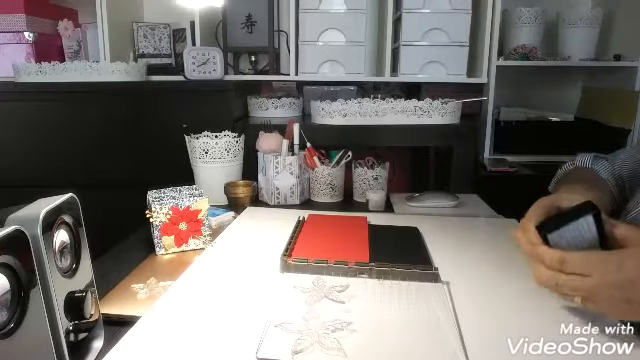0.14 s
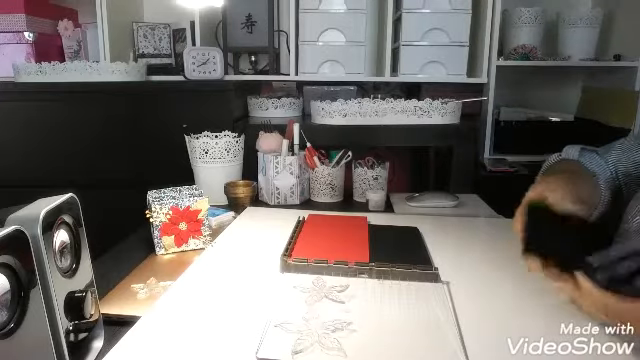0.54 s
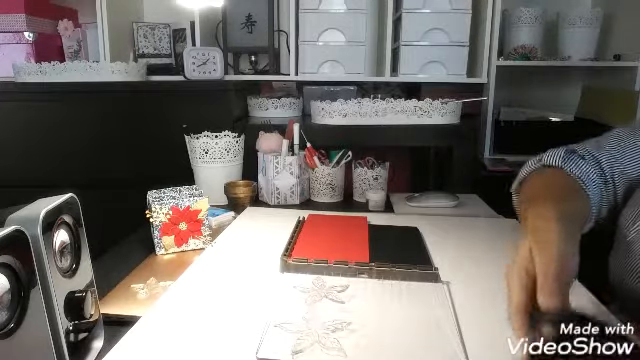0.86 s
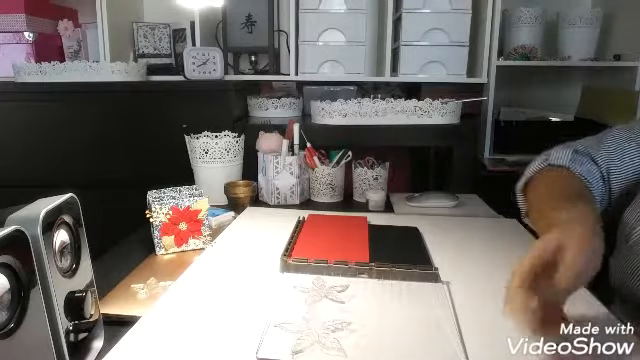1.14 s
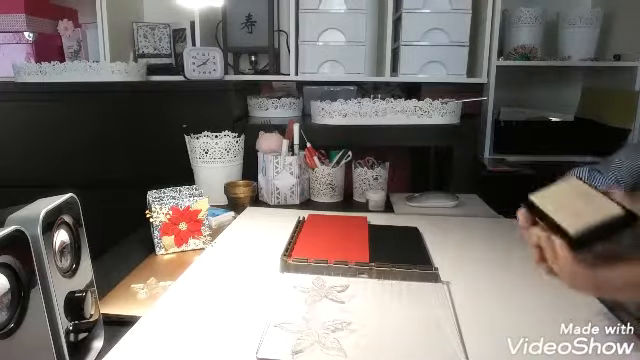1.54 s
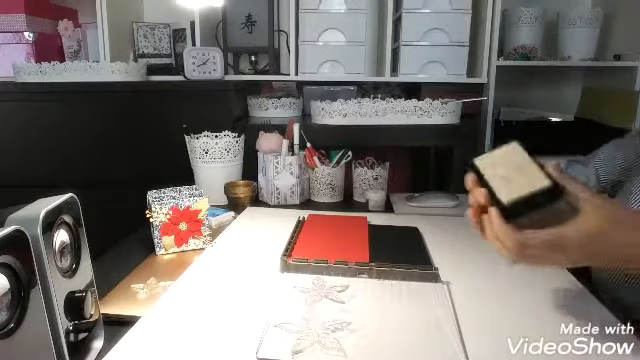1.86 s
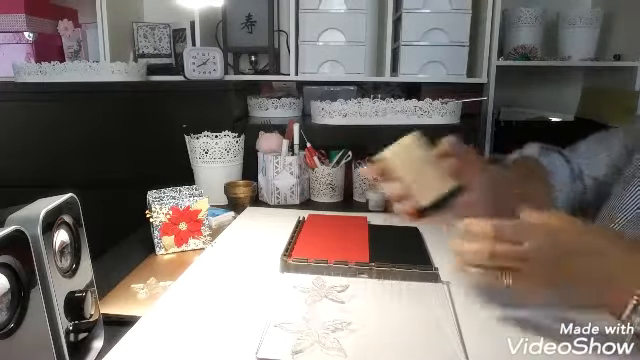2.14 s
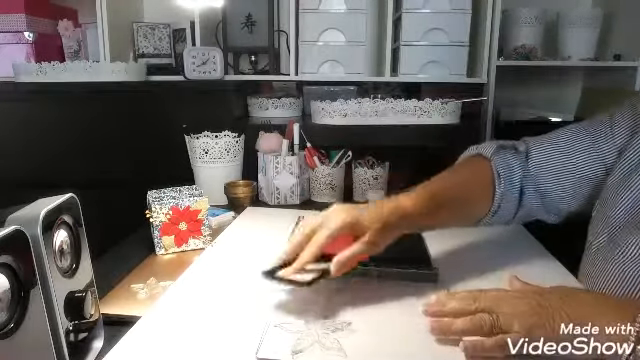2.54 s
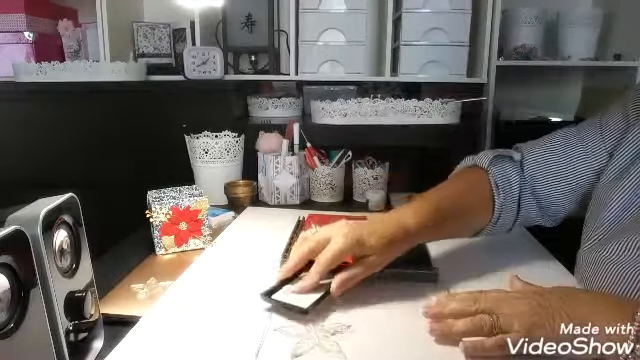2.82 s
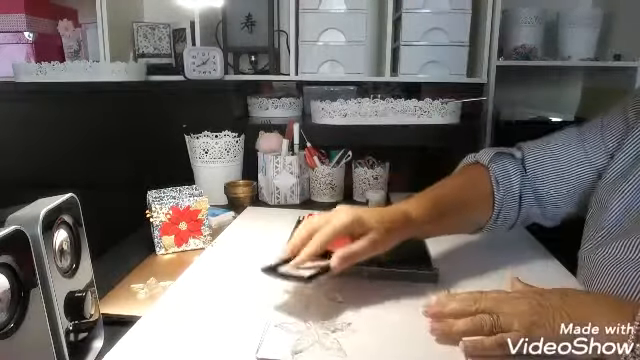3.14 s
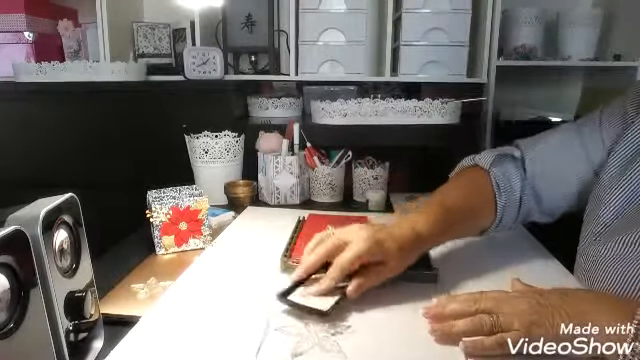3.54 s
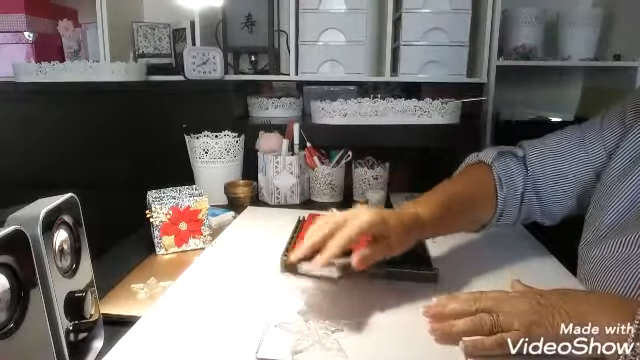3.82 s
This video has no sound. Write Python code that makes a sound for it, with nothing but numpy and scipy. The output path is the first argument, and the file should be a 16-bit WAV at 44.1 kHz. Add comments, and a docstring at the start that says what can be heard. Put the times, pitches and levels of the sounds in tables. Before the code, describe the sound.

A plastic ink pad lid clatters onto a craft table, then the pad is dabbed on a rubber stamp with light, hollow taps.

```python
"""Sleeves rustle over faint hiss, with a tick or two, then a plastic ink pad's lid clatters onto a craft table.
The lid rings as damped modes. The pad is then dabbed on a rubber stamp: a short rub leads most presses,
each press chatters, rings the case and thuds the table, and the tacky ink peels with a soft crackle.
A small furnished room answers with decaying noise; the pair of microphones hears it almost in mono."""
import sys
import numpy as np
from scipy import signal
from scipy.fft import rfft, irfft
from scipy.io import wavfile

SR = 44100
rng = np.random.default_rng(int(sys.argv[2]) if len(sys.argv) > 2 else 0)


def unload_wav(signal):
    """Save mono or channel-first audio to the path in sys.argv[1] as 16-bit WAV at rate SR, clipped to [-1, 1]."""
    wavfile.write(
        sys.argv[1],
        SR,
        np.round(np.clip(np.atleast_2d(signal).T, -1, 1) * 32767).astype(np.int16),
    )


N = 258988
HIT_N = 16000  # length of one contact with its tail, in samples
HIT_T = np.arange(HIT_N) / SR

# The pad knocks on the stamp: firm landings, and light knocks, one of them as the pad lifts away. Each row: #
# time in seconds, level in dB, treble and table thump in dB relative to that level, lead of the slide's start #
# over the knock in seconds (0 for none).
DAB_KNOCKS = [(3.1936, -33, -12.5, -22, .109), (3.6814, -48.5, -7.5, -16, 0),
              (3.7804, -34.5, -10.5, -10, .115), (4.4158, -35, -11, -5, .099), (4.758, -53, -19, 4, 0),
              (5.0298, -44.5, -19.5, -10, .075), (5.5084, -33, -13, -12.5, .084)]
# Ringing of the pad's case on the table. Each row: frequency in Hz, strength in dB, t60 in seconds.
CASE_MODES = [(263, -1, 0.19), (313, 4.5, 0.093), (488, -7, 0.083), (606, -4, 0.15), (801, 4.5, 0.21),
              (945, -24, 0.22), (1216, -16, 0.12), (1330, 14.5, 0.043), (1483, 15, 0.062), (1550, -36, 1),
              (1823, -6, 0.6), (1884, -5, 0.13), (1903, 10, 0.083), (1836, -15, 0.056), (2070, 10, 0.08),
              (2158, 3.5, 0.14), (2304, -2.5, 0.13), (2690, -16, 0.39), (3414, 0, 0.054),
              (4060, -2.5, 0.055)]
GRAZE_LEAD_S = 0.04  # the pad's edge grazes the stamp this long before it lands


def undb(db):
    """Decibels to gain."""
    return 10 ** (np.asarray(db) / 20)


def unit(x):
    """Scale to unit energy."""
    return x / np.sqrt(np.sum(x ** 2))


def add(track, s, sound):
    """Mix a sound into the track at a time in seconds."""
    start = max(int(s * SR), 0)
    track[start:start + len(sound)] += sound[:N - start]


def band(x, hz, kind, order=2):
    """Butterworth filter."""
    edges = np.clip(hz, 10, SR / 2 - 500)
    return signal.sosfilt(signal.butter(order, edges, kind, fs=SR, output="sos"), x)


def tint(x, points, size=2048):
    """Causal filter through (Hz, dB) points, built from the cepstrum."""
    hz, db = np.transpose(points)
    grid = np.maximum(np.arange(size // 2 + 1) * SR / size, 1)
    cepstrum = irfft(np.log(undb(np.interp(np.log(grid), np.log(hz), db))))
    # folding the cepstrum forward gives minimum phase
    cepstrum[1:size // 2] *= 2
    cepstrum[size // 2 + 1:] = 0
    response = irfft(np.exp(rfft(cepstrum)))
    return signal.fftconvolve(x, response)[:len(x)]


def fade(t60):
    """Exponential decay over the length of a hit."""
    return np.exp(-np.log(1000) * HIT_T / max(t60, 1 / SR))


def wander(points):
    """Random values joined by straight lines over the whole scene."""
    return np.interp(np.arange(N), np.linspace(0, N, points), rng.standard_normal(points))


def echoes(early_t60, room_t60, room_db):
    """Dense early reflections that die quickly, then the tail of the room."""
    near, far, size = rng.standard_normal((3, HIT_N))
    early = unit(near * undb(2.2 * size) * fade(early_t60))
    tail = unit(far * fade(room_t60) * (1 - fade(0.041)))
    return unit(early + undb(room_db) * tail)


def ring(modes, detune, damping):
    """Damped modes; strength and tuning vary with where the blow lands; contact adds damping (1/s)."""
    hz, db, t60 = np.transpose(modes)[:, :, None]
    size, shift, phase = rng.standard_normal((3, len(modes), 1))
    waves = np.sin(2 * np.pi * (hz * (1 + detune * shift) * HIT_T + phase))
    decays = np.exp(-(np.log(1000) / t60 + abs(damping)) * HIT_T)
    ringing = np.sum(undb(db + 2.0 * size) * decays * waves, axis=0)
    return unit(ringing * (1 - fade(.004)))


def spot(hz, t60):
    """The struck spot favours one short resonance."""
    return unit(np.sin(2 * np.pi * hz * HIT_T) * fade(t60))


def voice(x, db, bass_db, low_mid_db, treble_db, low_hz):
    """Weight of a contact sets its bass, hardness its treble; levels hold for the first 25 ms."""
    bands_hz = [[low_hz, 300], [300, 700], [700, 3200], [3200, 17000]]
    parts = [band(x, edges, "band", order=3) for edges in bands_hz]
    first = int(.025 * SR)
    gains = undb(db + np.array([bass_db, low_mid_db, 0, treble_db]))
    return sum(gain * part / np.std(part[:first]) for gain, part in zip(gains, parts))


def boom(hz, delay, width, linger):
    """A low thud that swells to its peak after a delay and may linger; its pitch varies slightly."""
    swell = np.exp(-((HIT_T - delay) / width) ** 2)
    swell = swell + linger * fade(0.73) * (1 - fade(0.095))
    pitch_hz = hz * (1 + 0.0073 * rng.standard_normal())
    return band(swell * np.cos(2 * np.pi * pitch_hz * (HIT_T - delay)), 36, "high")


def background(air_db=-70.5, hiss_db=-80, hum_db=-93, rumble_db=-90):
    """Still room air, a faint mains hum, deep rumble, and hiss that is opposite in the two microphones."""
    # Colour of the room air. Each row: frequency in Hz, level in dB.
    air_colour = [(15, -53.5), (25, -12), (48, -23), (81, -3), (128, -6.5), (176, -5.5), (326, -8),
                  (573, -12), (1060, -13.5), (1280, -13.5), (1670, -16.5), (2300, -18.5), (3090, -24.5),
                  (5570, -27), (15000, -25)]
    # Colour of the microphones' hiss. Each row: frequency in Hz, level in dB.
    hiss_colour = [(15, -48.5), (25, -14), (101, -10.5), (359, -10), (410, -9), (703, -13), (2060, -16),
                   (15500, -22)]
    air = tint(rng.standard_normal(N), air_colour)
    hiss = tint(rng.standard_normal(N), hiss_colour)
    hum = np.sqrt(2) * np.sin(2 * np.pi * 100 * np.arange(N) / SR)
    rumble = band(rng.standard_normal(N), 45, "low")
    common = undb(air_db) * air / np.std(air) + undb(hum_db) * hum
    common = common + undb(rumble_db) * rumble / np.std(rumble)
    return common + undb(hiss_db) * hiss / np.std(hiss) * np.array([[1], [-1]])


def sleeve(rest_db=-78.5):
    """Cloth rubs softly and a little unevenly, as filtered noise that swells as the arms reach."""
    # Each reach of the arm. Each row: middle in seconds, half length in seconds, level in dB before flutter.
    reaches = [(0, 0.036, -70.5), (0.736, 0.14, -71.5), (1.82, 0.35, -71.5)]
    t = np.arange(N) / SR
    power = undb(rest_db) ** 2
    power = power + sum(undb(db) ** 2 * np.exp(-((t - s) / half) ** 2) for s, half, db in reaches)
    flutter_db = wander(150)
    cloth = band(rng.standard_normal(N), [700, 2400], "band", order=1)
    return cloth / np.std(cloth) * np.sqrt(power) * undb(flutter_db)


def ticks(room_db=2):
    """Small sharp ticks scattered through the scene: a bright snap, a brief ring and a little room."""
    # Each row: start in seconds, level in dB, pitch in Hz, ringing in dB relative to the snap.
    tick_rows = [(0.358, -30.5, 1740, 6.5), (0.626, -41, 3370, 5), (1.5593, -38.5, 2500, -23),
                 (2.3422, -24.5, 2600, -10), (2.396, -36.5, 10100, -12), (2.449, -39.5, 7000, -17),
                 (2.9772, -37.5, 3500, -27), (3.0834, -38.5, 7500, -5), (5.752, -38.5, 3600, 0)]
    out = np.zeros(N)
    for s, db, hz, ring_db in tick_rows:
        snap = unit(rng.standard_normal(HIT_N) * fade(0.022))
        snap = snap + undb(room_db) * echoes(early_t60=0.12, room_t60=0.11, room_db=-14)
        click = unit(band(snap, [hz / 3, hz * 1.43], "band", order=1))
        click = click + undb(ring_db) * spot(hz, t60=0.085)
        add(out, s, undb(db) * unit(click))
    return out


def brushes(level_db=-60.5, start_db=-6, grain_db=3, peak_lead_s=0.011):
    """The hand's slide brings the pad down: a bright, grainy rub that swells, then fades out as the pad lands."""
    # Colour of the rub. Each row: frequency in Hz, level in dB.
    rub_colour = [(50, 7), (150, 6), (500, -0.5), (1400, 4.5), (2800, -4), (5000, -3.5), (8000, -9),
                  (11500, -7), (15000, -32)]
    t = np.arange(N) / SR
    catch_db = grain_db * wander(1500)
    rub = tint(rng.standard_normal(N) * undb(catch_db), rub_colour)
    swell = np.zeros(N)
    for s, _, _, _, slide_s in DAB_KNOCKS:
        if slide_s > GRAZE_LEAD_S:
            start, peak = s - slide_s, s - peak_lead_s
            swell += np.interp(t, [start - .01, start + 0.0017, peak, peak + 0.012], [0, undb(start_db), 1, 0])
    return undb(level_db) * swell * rub / np.std(rub)


def soft_contacts():
    """Steps of each rocking touch, and the dull, heavy graze late in each slide: (s, level, bass, treble dB)."""
    # Fingers shift, or the pad rocks on the tacky stamp and peels off. Each row: start in seconds, level in dB,
    # bass and treble in dB relative to it (bass before its trim), number of contacts,
    # level change from one to the next in dB.
    touch_rows = [(0.340, -61.5, -21, -20, 1, 0), (0.619, -66.5, -17, -7, 1, 0),
                  (2.865, -48, -18, -11.5, 1, 0), (2.923, -53, -11.5, -11.5, 1, 0),
                  (2.984, -65.5, -9, -7, 1, 0), (3.436, -53, -2, -8, 4, -2.5), (4.087, -53.5, -6, -5, 1, 0),
                  (4.159, -58, -13, -15.5, 1, -4), (4.331, -61.5, -22, -5, 1, 0),
                  (4.74, -53, -3.5, -4.5, 1, 0), (4.963, -57.5, -5, -10.5, 1, 0),
                  (5.217, -59, -5.5, -10, 1, 0), (5.271, -55, -5.5, -12, 2, 0.5),
                  (5.778, -54.5, -12, -10, 2, -6)]
    rock_s, rock_bass_db, rock_treble_db = .046, -11.5, -2.5  # even steps, each with less bass and treble
    graze_re_dab_db, graze_bass_db, graze_treble_db = -22.5, -2, -20
    contacts = []
    for s, db, bass_db, treble_db, count, change_db in touch_rows:
        for k in range(round(count)):
            step = (s + k * rock_s, db + k * change_db, bass_db + k * rock_bass_db, treble_db + k * rock_treble_db)
            contacts.append(step)
    for s, db, _, _, slide_s in DAB_KNOCKS:
        if slide_s > GRAZE_LEAD_S:
            contacts.append((s - GRAZE_LEAD_S, db + graze_re_dab_db, graze_bass_db, graze_treble_db))
    return contacts


def touches(bass_trim_db=-2, modes_db=-9, spot_db=-11, boom_db=-1, grain_db=5, first_db=-15):
    """A first contact, then many tiny sticks and releases that crackle into the pad's case."""
    # Colour of the soft contacts. Each row: frequency in Hz, level in dB.
    peel_colour = [(47, -32), (80, -5.5), (168, -7), (371, -20.5), (684, -4.5), (1130, -3), (1290, 1.5),
                   (1680, -8), (2230, -3.5), (2720, -16.5), (4210, -26.5), (7610, -28.5), (8870, -28.5),
                   (11500, -24), (15000, -49)]
    rise_s, length_s = 0.015, 0.015  # peak and half width of the crackle's swell
    out = np.zeros(N)
    for s, db, bass_db, treble_db in soft_contacts():
        push, size = rng.standard_normal((2, HIT_N))
        swell = np.exp(-((HIT_T - rise_s) / length_s) ** 2)
        grains = unit(push * undb(grain_db * size) * swell)
        grains = grains + undb(first_db) * signal.unit_impulse(HIT_N)
        paths = signal.unit_impulse(HIT_N) + 0.84 * echoes(early_t60=0.16, room_t60=0.32, room_db=-6.5)
        case = undb(modes_db) * ring(CASE_MODES, detune=0.0187, damping=3.8)
        case = case + undb(spot_db) * spot(1298, t60=0.067)
        crackle = signal.fftconvolve(grains, unit(tint(paths, peel_colour)) + case)[:HIT_N]
        add(out, s, voice(crackle, db, bass_db + bass_trim_db, -7.5, treble_db, low_hz=99))
        add(out, s, undb(db + bass_db + boom_db) * boom(hz=96.2, delay=0.0455, width=0.013, linger=0.1))
    return out


def lid(gain_db=-1, treble_trim_db=-1, modes_db=-6, spot_db=-4, snap_db=-22):
    """Hard plastic edges strike the table in turn: a bright snap, a crack, its reflections and the ringing shell."""
    # The lid lands and rocks to rest. Each row: start in seconds, level in dB before the gain, low mids in dB
    # and treble in dB before its trim, both relative to the level, resonance of the struck spot in Hz.
    clacks = [(0.946, -49, 4, 1.5, 852), (0.986, -47.5, 2, -8.5, 883), (1.0139, -37.5, -10.5, -10, 1110),
              (1.026, -36.5, -9, -18, 1174), (1.0904, -34, -2.5, -12.5, 1268),
              (1.133, -35.5, -8, -16, 1207), (1.16, -35.5, -7.5, -8, 893), (1.174, -39, 4, -7, 1260),
              (1.186, -25.5, -14.5, -19, 1370), (1.198, -35, -4, -9, 1160), (1.2138, -34.5, -8, -20, 1430),
              (1.229, -34.5, -11, -17.5, 1280)]
    # The sharp edge, then the blunt one. Each row: upper resonance in Hz, its level in dB relative to the
    # struck spot, crack in dB for the loudest blow.
    edges = [(2345, -7.5, -5), (1647, -6, -15.5)]
    # Ringing of the lid. Each row: frequency in Hz, strength in dB, t60 in seconds.
    lid_modes = [(225, 5, 0.18), (379, -13, 0.3), (506.7, -1, 0.39), (740, -10.5, 0.64), (834.6, 0, 0.32),
                 (880, -13, 0.24), (1019, 3, 0.47), (1038, -23, 0.277), (1393, -22, 0.31), (1196, -35, 1),
                 (1361, -21, 0.31), (1330, -8, 0.06), (1530, 8, 0.25), (1886, -1, 0.1), (1934, -25, 0.14),
                 (2237, -39, 0.223), (2325, -9, 0.122), (2518, -41, 0.39), (3080, -19, 0.29),
                 (3310, -20, 0.27)]
    # Colour of its dense short resonances. Each row: frequency in Hz, level in dB.
    lid_colour = [(29, -58.5), (50, -21.5), (93, -3), (285, -9), (362, -3.5), (557, -10), (816, -2),
                  (941, -7), (1310, 0.5), (2070, -11.5), (2330, -7.5), (2960, -20), (7870, -25.5),
                  (13600, -45), (15000, -70)]
    # the loudest blow and its bass, both before the gain; growth of bass and crack with the blow (dB per dB)
    loudest_db, loudest_bass_db, bass_growth, crack_growth = -25.5, -45, .25, 0.71
    # low spots hold longer, for a set number of cycles; light contacts ring more (dB per dB)
    spot_cycles, ring_fall = 210, 0.25
    out = np.zeros(N)
    for k, (s, db, low_mid_db, treble_db, hz) in enumerate(clacks):
        upper_hz, upper_db, crack_db = edges[k % len(edges)]
        force_db = db - loudest_db
        bass_db = loudest_bass_db + bass_growth * force_db - db
        snap = unit(band(rng.standard_normal(HIT_N) * fade(0.016), [3500, 8000], "band"))
        crack = unit(tint(signal.unit_impulse(HIT_N), lid_colour))
        crack = undb(crack_db + crack_growth * force_db) * crack
        scatter = unit(tint(echoes(early_t60=.1, room_t60=.26, room_db=-3.5), lid_colour))
        struck = undb(-ring_fall * min(force_db, 0)) * spot(hz, spot_cycles / hz)
        struck = struck + undb(upper_db) * spot(upper_hz, t60=0.107)
        shell = undb(modes_db) * ring(lid_modes, detune=0.0039, damping=7.4) + undb(spot_db) * struck
        clack = undb(snap_db) * snap + crack + scatter + shell
        add(out, s, voice(clack, db + gain_db, bass_db, low_mid_db, treble_db + treble_trim_db, low_hz=78.0))
    return out


def chatter(gap_s, keep, soft_hz=3000, scuff_t60=0.0065, count=4):
    """The pad's hard edge scuffs as it lands, then its face bounces a few times, tending softer."""
    bounces = np.zeros(HIT_N)
    for k, (late, size) in enumerate(rng.standard_normal((count - 1, 2)), 1):
        bounces[int(abs(gap_s * (k + .1 * late)) * SR)] += keep ** k * undb(2 * size)
    scuff = unit(rng.standard_normal(HIT_N) * fade(scuff_t60))
    face = band(signal.unit_impulse(HIT_N) + bounces, soft_hz, "low")
    return face + band(scuff, soft_hz, "high")


def dabs(crack_db=-4, modes_db=-6, spot_db=-10, boom_db=-10):
    """The pad chatters onto the stamp, its case rings, the table thuds and the room returns a deeper boom."""
    # Colour of the pad's dense short resonances. Each row: frequency in Hz, level in dB.
    pad_colour = [(29, -27), (50, 11), (279, -12), (408, -14.5), (674, -9.5), (742, -8.5), (987, -5.5),
                  (1350, -3), (1750, -9.5), (2120, -8.5), (2890, -20), (6200, -25.5), (9310, -35),
                  (11300, -29.5), (15000, -55)]
    bass_db, low_mid_db = -10.5, -6.5  # the same body for every dab, relative to its level
    out = np.zeros(N)
    for s, db, treble_db, thump_db, _ in DAB_KNOCKS:
        contacts = chatter(gap_s=.0042, keep=0.82)
        crack = undb(crack_db) * unit(tint(contacts, pad_colour))
        rattle = unit(tint(echoes(early_t60=0.093, room_t60=0.28, room_db=-2), pad_colour))
        case = undb(modes_db) * ring(CASE_MODES, detune=0.0077, damping=11.7)
        case = case + undb(spot_db) * spot(1254.5, t60=0.12)
        case = signal.fftconvolve(unit(contacts), case)[:HIT_N]
        add(out, s, voice(crack + rattle + case, db, bass_db, low_mid_db, treble_db, low_hz=153.5))
        add(out, s, undb(db + thump_db) * boom(hz=133, delay=0.0211, width=0.0067, linger=0))
        add(out, s, undb(db + boom_db) * boom(hz=95.1, delay=0.062, width=0.0092, linger=0.23))
    return out


def scene():
    """All handling sits in the centre; a faint, mostly treble spread follows it, opposite in the two channels."""
    # Colour of the stereo spread. Each row: frequency in Hz, level in dB.
    spread_colour = [(100, -41), (1200, -66.5), (3000, -31.5), (8000, -16), (14000, -4.5)]
    handling = sleeve() + ticks() + brushes() + touches() + lid() + dabs()
    spread = tint(unit(rng.standard_normal(HIT_N) * fade(.03)), spread_colour)
    side = signal.fftconvolve(handling, spread)[:N]
    return background() + handling + side * np.array([[1], [-1]])


def record(dry):
    """The microphone port has a notch in the treble; the top is cut above 15.6 kHz."""
    coloured = dry - 0.5 * band(dry, [8600, 9700], "band", order=1)
    top_cut = signal.ellip(8, .2, 70, 15600, fs=SR, output="sos")
    return signal.sosfilt(top_cut, coloured)


dry = scene()
out = record(dry)
unload_wav(out)
```